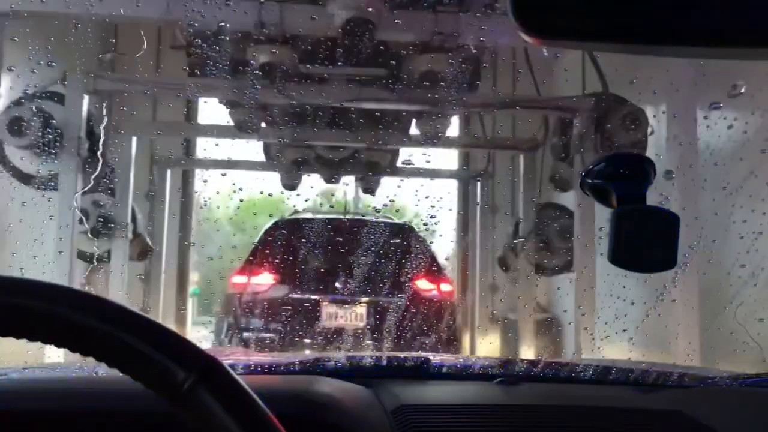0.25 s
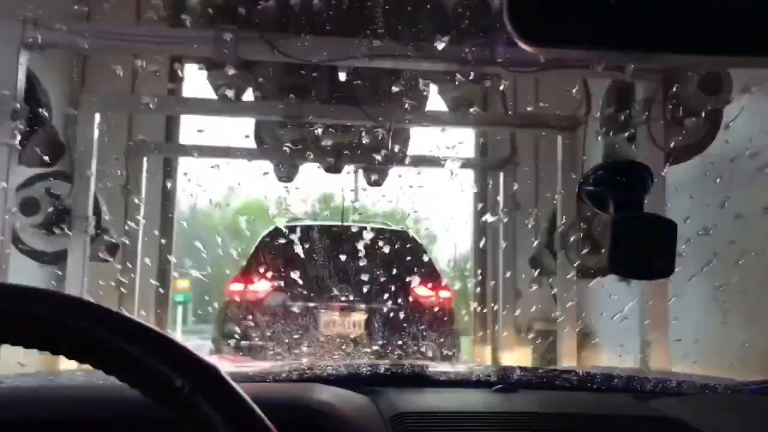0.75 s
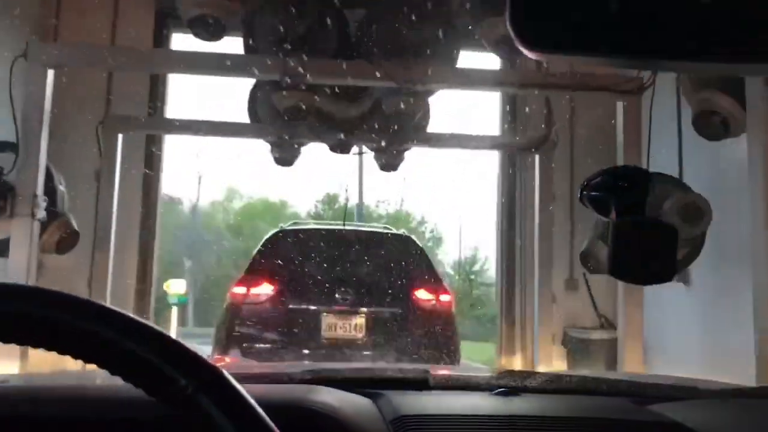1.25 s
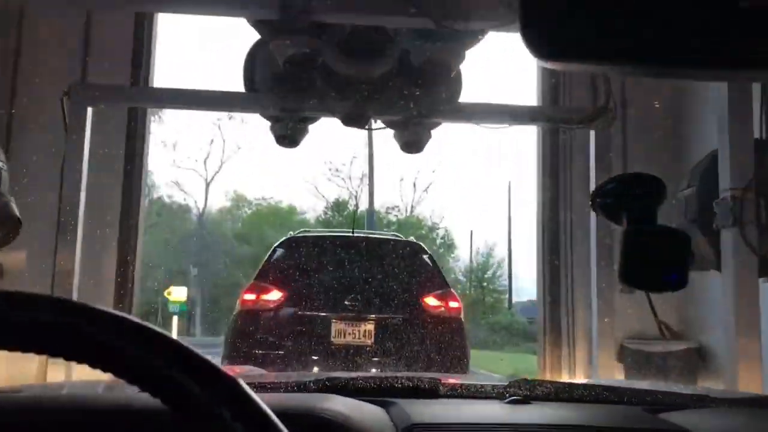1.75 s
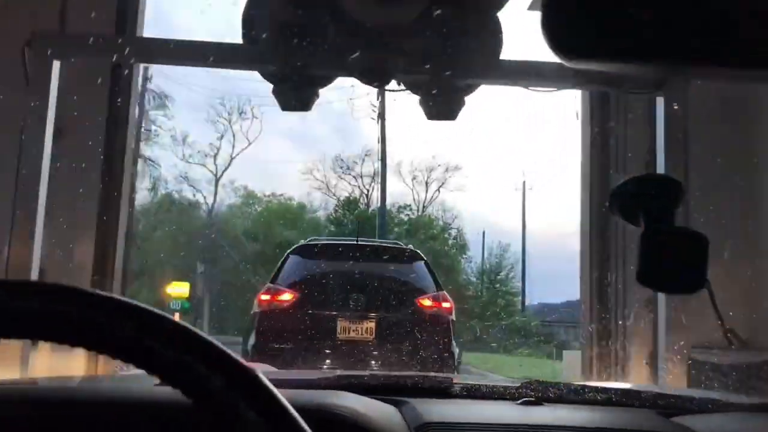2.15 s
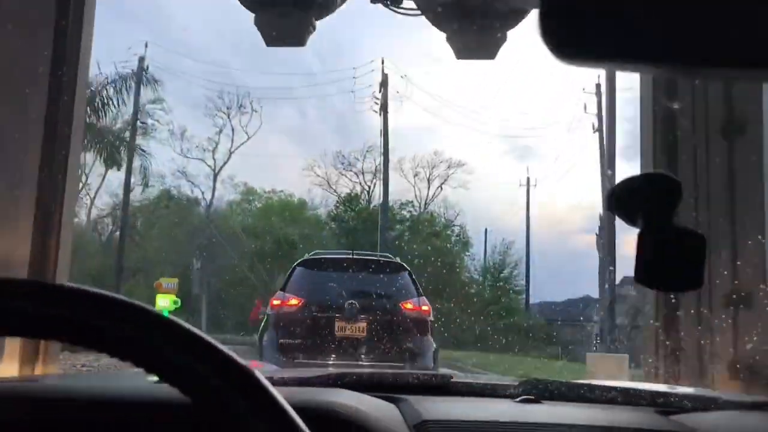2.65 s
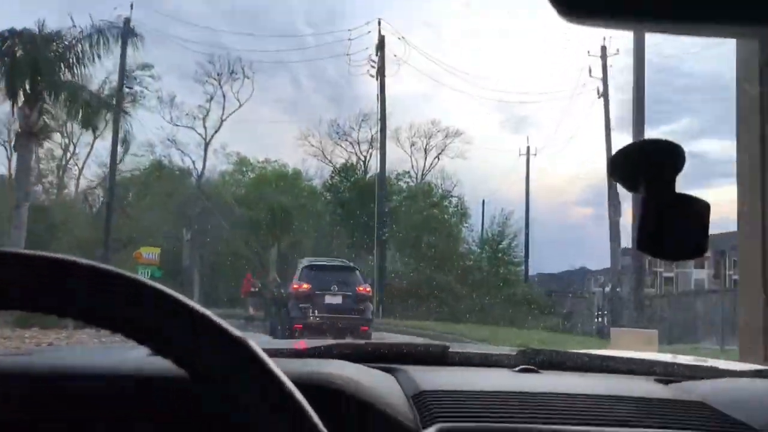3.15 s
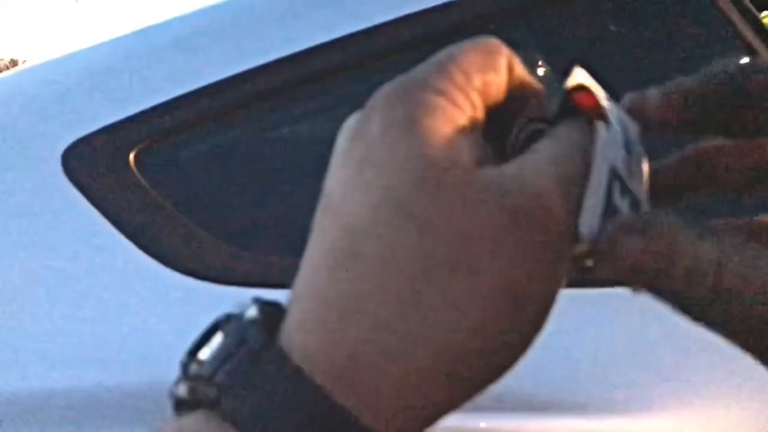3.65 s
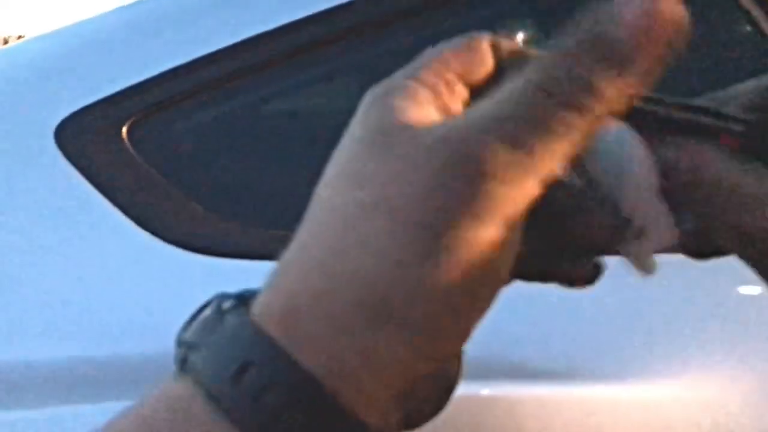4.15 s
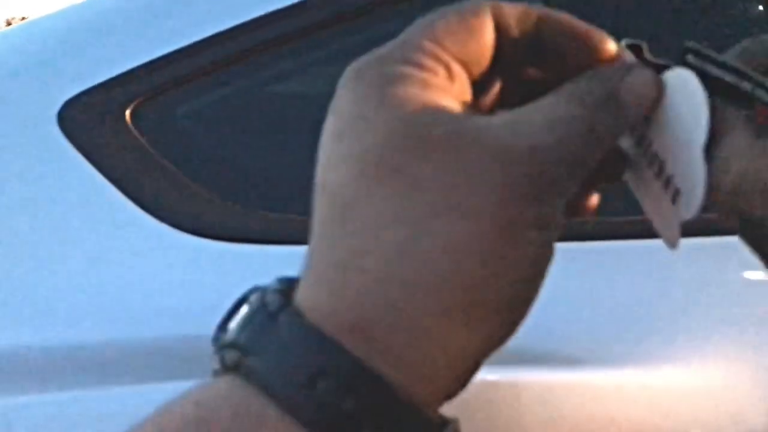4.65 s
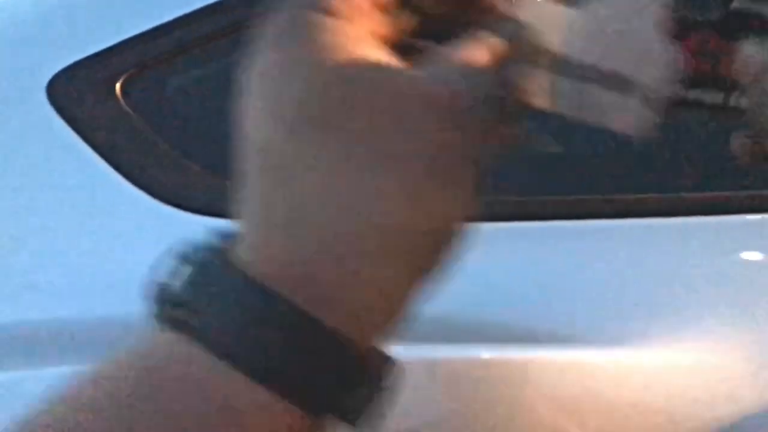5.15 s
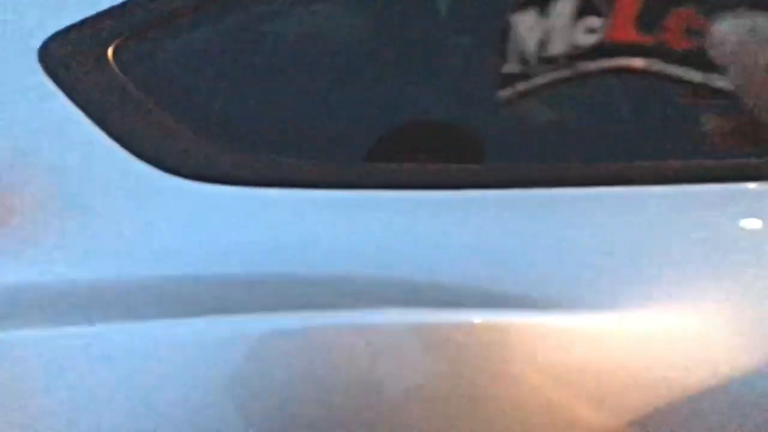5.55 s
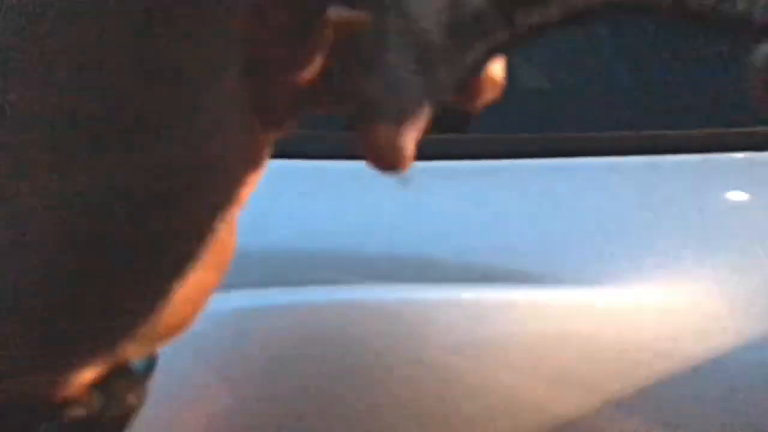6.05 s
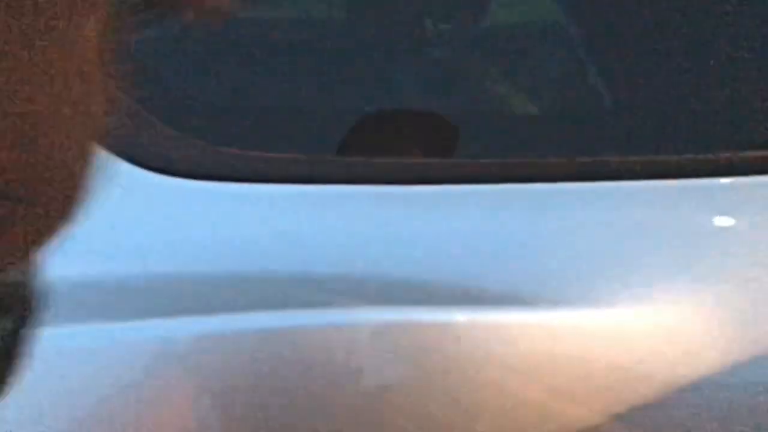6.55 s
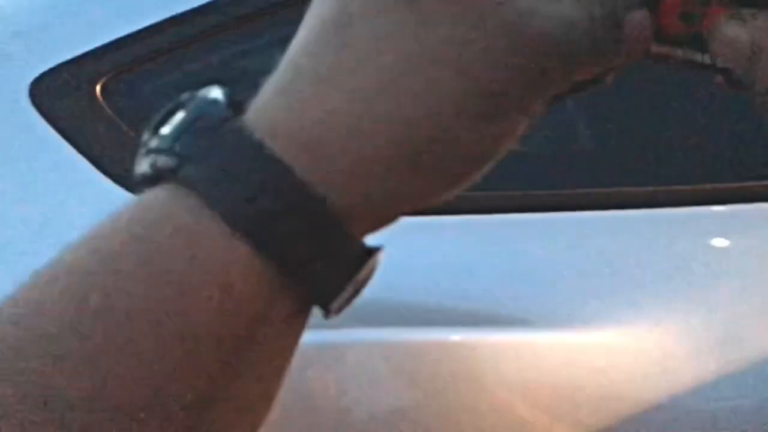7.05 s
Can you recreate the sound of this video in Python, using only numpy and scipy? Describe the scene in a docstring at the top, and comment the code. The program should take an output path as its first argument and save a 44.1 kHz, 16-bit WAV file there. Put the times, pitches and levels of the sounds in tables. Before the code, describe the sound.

From 0 to about 3.4 seconds, heard inside a car, drying blowers roar over the windshield and roof: dense, fluttering air noise with wavering fan whine around the middle pitches, hissing spray strongest at the very start, and tiny very high squeaks between 0.3 and 1.6. The roar grows steadily, with deep roof booms from 1.7 onward and a breathy nozzle whistle. At 3.4 it cuts dead to a quiet street with low distant traffic. Close to the microphone, fingers rustle and peel stiff plastic film, with crisp small snaps until 4.3, softer sliding to 4.9, then busier scraping rising into one loud sharp crack at 5.3. A small bird twitters from 5.5 to 6.8, most clearly near 5.8. Hollow knocks and clicks on the car body cluster at 6.2 to 6.5, then faint rubbing and light ticks continue to the end at about 7.3.

```python
"""Inside a car under the drying blowers of a car wash, then, at a hard cut, a quiet street; all mono.
Wash: layered noise is the air drumming on roof and glass, shaken sines are the fan blades, chirps squeak.
Street: noise bands are far traffic, gliding tones are a songbird. Hands work a plastic sticker close by:
noise strokes rustle, gliding bands scrape, decaying bursts snap, short sines knock on the car body."""
import sys
import numpy as np
from scipy import signal
from scipy.fft import rfft, irfft, next_fast_len
from scipy.io import wavfile

SR = 44100
rng = np.random.default_rng(int(sys.argv[2]) if len(sys.argv) > 2 else 0)


def put_to_file(sound):
    """Save the sound as 16-bit audio at rate SR, in the file named by the first command-line argument."""
    columns = np.atleast_2d(sound).T  # one column per channel
    safe = np.clip(columns, -1, 1)
    whole_steps = np.round(safe * 32767)
    wavfile.write(sys.argv[1], SR, whole_steps.astype(np.int16))


def amplitude_ratio(level_db):
    """Convert a level in decibels to the matching linear amplitude (field) ratio."""
    exponent = np.asarray(level_db, float) / 20
    return 10 ** exponent


N = 321489
CUT_S = 3.3775   # wash before, street after


def rms_one(x):
    """Scale to unit rms."""
    return x / np.sqrt(np.mean(x ** 2) + 1e-20)


def in_time(rows):
    """Table columns joined by straight lines, one value a sample."""
    s, *columns = np.transpose(rows)
    return [np.interp(np.arange(N) / SR, s, c) for c in columns]


def drift(corner_hz):
    """Slow random curve, rms 1: noise through two equal poles at corner_hz, drawn every 40 samples."""
    r = np.exp(-80 * np.pi * corner_hz / SR)
    slow = signal.lfilter([1], [1, -2 * r, r * r], rng.standard_normal(N // 40 + 2002))[2000:]
    return np.interp(np.arange(N) / 40, np.arange(len(slow)), rms_one(slow))


def resonance(x, hz, width_hz):
    """Two-pole band-pass with gain 1 on top."""
    r = np.exp(-np.pi * width_hz / SR)
    poles = [1, -2 * r * np.cos(2 * np.pi * hz / SR), r * r]
    return signal.lfilter([(1 - r * r) / 2, 0, (r * r - 1) / 2], poles, x)


def coloured(x, spectrum):
    """Filter a steady signal by (f/Hz, level/dB) points; rms 1."""
    hz, level_db = np.transpose(spectrum)
    size = next_fast_len(N)
    log_hz = np.log(np.arange(size // 2 + 1) * SR / size + 1)
    gain = amplitude_ratio(np.interp(log_hz, np.log(hz), level_db))
    return rms_one(irfft(rfft(x, size) * gain, size)[:N])


def layers(x, splits_hz):
    """Cut a signal into neighbouring frequency layers, each scaled to rms 1."""
    lows = [signal.sosfiltfilt(signal.butter(2, hz, fs=SR, output="sos"), x) for hz in splits_hz]
    return [rms_one(b - a) for a, b in zip([0] + lows, lows + [x])]


def grains(per_s, spread_db):
    """Random clicks of uneven size and sign; rms 1."""
    sizes = amplitude_ratio(spread_db * np.minimum(rng.exponential(1, N), 5)) * rng.choice([-1, 1], N)
    return rms_one(sizes * (rng.random(N) < per_s / SR))


def moving_band(hz, width_hz):
    """Noise in a band whose centre follows a curve: low noise on two carriers in quadrature; rms 1."""
    phase = 2 * np.pi * np.cumsum(hz) / SR
    low_pass = signal.butter(4, width_hz / 2, fs=SR, output="sos")
    a, b = signal.sosfilt(low_pass, rng.standard_normal((2, N)))
    return rms_one(a * np.sin(phase) + b * np.cos(phase))


def swell(s, db, rise_s, fall_s):
    """Gain peaking at s, straight in dB: 15 dB down one rise before and one fall after."""
    lag = np.arange(N) / SR - s
    return amplitude_ratio(db - 15 * np.maximum(-lag / rise_s, lag / fall_s))


def plateau(start_s, end_s, edge_s):
    """1 between two times, 0 outside, with sloping edges."""
    half = edge_s / 2
    corners = [start_s - half, start_s + half, end_s - half, end_s + half]
    return np.interp(np.arange(N) / SR, corners, [0, 1, 1, 0])


# traffic rumble: (t/s, level/dB)
TRAFFIC = [(3.4, -53), (4.3, -54.5), (4.71, -53), (5.0, -54), (5.63, -53), (5.85, -52), (6.29, -50),
           (6.55, -51), (7.29, -52)]
# traffic spectrum: (f/Hz, relative density/dB)
TRAFFIC_SPECTRUM = [(12, -42), (20, -23), (50, 3.5), (125, 2.5), (346, -10.5), (600, -12), (978, -16),
                    (1330, -21.5), (1700, -29.5), (2100, -36), (2600, -42), (3380, -47.5), (5720, -120)]
# low hum: (f/Hz, width/Hz, level/dB)
LOW_HUM = (121.5, 9, -61.5)
# whine swells: (peak t/s, level/dB, rise/s, fall/s)
WHINE_SWELLS = [(3.4, -57.5, 0.03, 1.55), (4.6, -70, 0.048, 2.5), (5.32, -53, 0.037, 0.035),
                (6.2, -69, 0.64, .2), (7.2, -65.5, 0.55, 0.16)]
# whine bands: (f/Hz, width/Hz, relative level/dB)
WHINE_MODES = [(1250, 300, 0), (2180, 260, -14)]


def street():
    """Far traffic: lumpy noise rumble, smoother tyre hiss following it, a narrow-band hum and whine."""
    tyre_db = -58.5   # at mean rumble
    rumble, hiss = layers(coloured(rng.standard_normal(N), TRAFFIC_SPECTRUM), splits_hz=(300,))
    rumble_db, = in_time(TRAFFIC)
    hiss_db = tyre_db + rumble_db - rumble_db.mean()
    white = rng.standard_normal(N)
    hum_hz, hum_width_hz, hum_db = LOW_HUM
    hum = amplitude_ratio(hum_db) * rms_one(resonance(white, hum_hz, hum_width_hz))
    whine = sum(amplitude_ratio(db) * rms_one(resonance(resonance(white, hz, width), hz, width))
                for hz, width, db in WHINE_MODES)
    whine = whine * sum(swell(*row) for row in WHINE_SWELLS)
    rumble = amplitude_ratio(rumble_db + 1.0 * drift(10.0)) * rumble
    hiss = amplitude_ratio(hiss_db + 0.25 * drift(27.0)) * hiss
    return rumble + hiss + hum + whine


# buzzy notes: (start t/s, length/s, start f/Hz, end f/Hz, level/dB)
BUZZY_NOTES = [(5.51, 0.018, 2500, 3190, -69), (5.518, 0.021, 3120, 3330, -65),
               (5.532, .021, 3350, 3300, -63), (5.55, .022, 3180, 2450, -68),
               (5.735, 0.055, 2790, 2810, -67), (5.788, .014, 2830, 3150, -70)]
# whistled notes: (start t/s, length/s, start f/Hz, end f/Hz, level/dB)
WHISTLED_NOTES = [(5.472, 0.018, 2870, 2800, -74), (5.585, .045, 3330, 3350, -77),
                  (5.63, .045, 3000, 2900, -77), (5.672, .024, 3300, 3800, -73),
                  (5.694, .018, 3850, 3150, -74), (5.799, 0.032, 3150, 3500, -62),
                  (5.83, 0.056, 3620, 3940, -57), (5.88, 0.018, 3960, 4150, -60),
                  (5.892, .05, 3800, 3890, -69), (5.949, .015, 3800, 4000, -68),
                  (5.963, 0.053, 4530, 4740, -67), (6.008, .022, 4740, 4580, -72),
                  (6.03, 0.034, 4700, 4800, -80), (5.838, 0.02, 1260, 1300, -55),
                  (5.858, 0.03, 1350, 1440, -64), (6.11, .021, 5400, 5550, -70),
                  (6.137, .098, 6070, 6100, -68), (6.506, .022, 4600, 4400, -71),
                  (6.697, 0.014, 3050, 3170, -73), (6.72, 0.022, 3200, 3150, -67.5),
                  (6.752, 0.015, 3150, 2950, -67), (6.805, .018, 3050, 3150, -73),
                  (4.815, .04, 3720, 3570, -69), (4.927, 0.022, 3920, 4000, -63)]
# upsweeps: (start t/s, length/s, level at the top/dB)
UPSWEEP_NOTES = [(6.056, 0.054, -61), (6.327, 0.056, -58), (6.472, 0.044, -65)]
# pitch paths: (share of length, share of climb); upsweeps slow on the way
UPSWEEP_PATH = [(0, 0), (.35, .55), (.62, .68), (.72, .88), (1, 1)]
PLAIN_PATH = [(0, 0.093), (1, 0.95)]


def bird(echo_s=0.016, echo_db=-22, jitter_hz=16.0, flutter_db=2.5, edge_share=0.21):
    """Unsteady gliding sines with harmonics; strong-weak cycles of a buzz add 1.5 and 2.5 x pitch; wall echo."""
    half_line_db, sweep_hz, sweep_swell_db = -11, (2500, 4750), 8
    second_db, second_db_per_khz = -7, -15.5   # second harmonic at 3 kHz; weaker above and below
    pure_below_db = -64   # softer clear notes lose 1 dB of second harmonic per dB
    gain_db = 1   # rise over a note
    out, waver, flutter = np.zeros(N), jitter_hz * drift(90.0), amplitude_ratio(flutter_db * drift(70.0))
    notes = [(*row, amplitude_ratio(half_line_db), 0, PLAIN_PATH) for row in BUZZY_NOTES]
    notes += [(*row, 0, 0, PLAIN_PATH) for row in WHISTLED_NOTES]
    notes += [(s, length, *sweep_hz, db, 0, sweep_swell_db, UPSWEEP_PATH) for s, length, db in UPSWEEP_NOTES]
    for s, length, start_hz, end_hz, db, half, swell_db, path in notes:
        at = np.arange(round(s * SR), round((s + length) * SR))
        n = len(at)
        hz = start_hz + (end_hz - start_hz) * np.interp(np.linspace(0, 1, n), *np.transpose(path))
        phase = 2 * np.pi * np.cumsum(hz + waver[at]) / SR
        purer_db = (half == 0) * min(db - pure_below_db, 0)
        second = amplitude_ratio(second_db + second_db_per_khz * np.abs(hz / 1000 - 3) + purer_db)
        upper_half = np.clip(2.7 - hz / 1300, 0, 1) * np.sin(5 * phase / 2)
        tone = np.sin(phase) + half * (np.sin(3 * phase / 2) + upper_half) + second * np.sin(2 * phase)
        level_db = db - swell_db * np.linspace(1, 0, n) ** 2 + gain_db * np.linspace(-.5, .5, n)
        out[at] += np.sqrt(2) * amplitude_ratio(level_db) * tone * signal.windows.tukey(n, edge_share)
    out *= flutter
    return out + amplitude_ratio(echo_db) * np.roll(out, round(echo_s * SR))


# hollow knocks of a hand on the car body: (t/s, peak level/dB, f/Hz, t60/s)
BODY_KNOCKS = [(6.2375, -35, 560, .03), (6.246, -37, 520, 0.043), (6.2565, -33, 640, 0.032),
               (6.312, -42, 626, 0.037), (6.415, -37, 630, 0.06), (6.423, -41, 700, .05),
               (6.521, -41, 594, .05), (6.541, -44, 600, .04)]


def knocks():
    """Each knock is one panel mode: a sine with a soft attack and exponential decay."""
    out, t = np.zeros(N), np.arange(round(.15 * SR)) / SR
    for s, db, hz, t60 in BODY_KNOCKS:
        decay = amplitude_ratio(db - 60 * t / t60) * np.minimum(t / 0.0042, 1)
        out[round(s * SR):][:len(t)] += decay * np.sin(2 * np.pi * hz * t)
    return out


# hand glides: (start t/s, end t/s, level/dB)
HAND_GLIDES = [(4.47, 4.97, -82), (6.678, 7.26, -85.5)]
# airy rings of a glide: (f/Hz, width/Hz, relative level/dB)
GLIDE_RINGS = [(2240, 250, 4.5), (2900, 300, 6.5), (3680, 300, 2), (5900, 810, 0), (7500, 500, 1),
               (8600, 600, -5)]


def glides():
    """Faint airy rings while the hand glides: noise bands wandering in pitch and level."""
    rings = sum(amplitude_ratio(db + 4.0 * drift(12.0)) * moving_band(hz * (1 + .02 * drift(3.0)), width)
                for hz, width, db in GLIDE_RINGS)
    return rings * sum(amplitude_ratio(db) * plateau(a, b, edge_s=.08) for a, b, db in HAND_GLIDES)


# film spectrum: (f/Hz, relative density/dB)
FILM_SPECTRUM = [(1060, -2.5), (1800, 2), (2720, -2.5), (3440, -3.5), (3910, -2), (4530, -3), (4970, -5),
                 (6180, -4), (8590, -7.5), (10400, -8), (11700, -3), (14300, -2), (16000, -4)]
# floor between strokes: slide, rub, top hiss (level/dB each)
RESTING_LEVELS = (-77, -84, -92)
# fingers slide, glue lets go: (start t/s, end t/s, level/dB, growth/dB, brightness/dB)
FINGER_STROKES = [(3.427, 3.455, -62, 1, 5), (3.456, 3.494, -65.5, -2, 0), (3.49, 3.53, -63.5, -6.5, -3),
                  (3.596, 3.646, -67.5, -3, 1.5), (3.656, 3.765, -67.5, -6, -0.5),
                  (3.76, 3.8, -80.5, 0, -6), (3.826, 3.885, -75, -0.5, -3), (3.885, 3.972, -68.5, 0, 5.5),
                  (3.975, 4.017, -70, -2, -16), (4.015, 4.108, -71, 2.5, 3), (4.133, 4.163, -65, -2, 0),
                  (4.185, 4.24, -73.5, 0, 8.5), (4.283, 4.327, -66, 7, 4.5), (4.331, 4.38, -78, 5, 3),
                  (4.39, 4.448, -74, -9.5, 3.5), (4.533, 4.95, -67, 2, -13.5),
                  (4.587, 4.625, -68, -3, -0.5), (4.662, 4.7, -72.5, 2, -3.5), (4.83, 4.95, -78.5, 7, 6),
                  (4.953, 5.044, -65.5, 2, 1), (5.04, 5.207, -75.5, -3, 6.5),
                  (5.071, 5.125, -61.5, 4.5, -2), (5.125, 5.2, -71.5, -4, -3),
                  (5.198, 5.308, -69.5, 10.5, 8.5), (5.33, 5.4, -79.5, -2, 1),
                  (5.42, 5.72, -74.5, 6.5, -12.5), (5.719, 5.737, -59, -4.5, -3),
                  (5.79, 6.083, -73, -8, -8), (6.087, 6.24, -71, 2, 4), (6.24, 6.33, -65.5, 0, 0),
                  (6.305, 6.319, -63.5, 0, 3), (6.392, 6.412, -68, 0, 1.5), (6.33, 6.522, -71, -6.5, 1),
                  (6.523, 6.6, -79.5, -7, -3), (6.64, 7.0, -68.5, -2, -14.5), (7.028, 7.243, -68.5, 0, -13),
                  (7.08, 7.109, -77, -2.5, 7), (7.17, 7.285, -77.5, 4, 4)]


def rustle(grain_share=0.68, patchy_db=1.4):
    """Skin friction is smooth noise, tearing glue adds dense grains; both come in clumps."""
    stroke_edge_s, linger_s, linger_share = 0.0128, 0.03, .14   # a share of the power dies away slowly
    top_hiss_db, top_follows = -5, 0.99   # top hiss re slide; share of brightness
    slide_base_hz, slide_hz_per_db = 3530, 44   # brighter strokes ring higher
    rub = rng.standard_normal(N) + grain_share * grains(2500, spread_db=4.5)
    low, body, top = layers(coloured(rub, FILM_SPECTRUM), splits_hz=(4400, 10300))
    power = amplitude_ratio(np.array(RESTING_LEVELS)[:, None] * np.ones(N)) ** 2
    for a, b, db, growth_db, bright_db in FINGER_STROKES:   # strokes add in power
        level_db = db + growth_db * np.interp(np.arange(N) / SR, [a, b], [-.5, .5])
        stroke = plateau(a, b, stroke_edge_s) * amplitude_ratio(level_db)
        layer_db = np.array([[0], [bright_db], [top_hiss_db + top_follows * bright_db]])
        power += (stroke * amplitude_ratio(layer_db)) ** 2
    keep = np.exp(-1 / (linger_s * SR))
    lingering = signal.lfilter([1 - keep], [1, -keep], power)
    power = (1 - linger_share) * power + linger_share * lingering
    power = power * amplitude_ratio([patchy_db * drift(25.23) for _ in power]) ** 2   # patches per layer
    slide_hz = slide_base_hz + slide_hz_per_db * 10 * np.log10(power[1] / power[0])
    slide = rms_one(low + .3 * amplitude_ratio(3 * drift(15.0)) * moving_band(slide_hz, 600.0))
    return amplitude_ratio(1.0 * drift(43.0)) * np.sum(np.sqrt(power) * [slide, body, top], axis=0)


# taut film under a scrape: (start t/s, end t/s, level/dB, start f/Hz, end f/Hz)
FILM_SCRAPES = [(3.43, 3.465, -66, 3600, 3500), (3.6, 3.72, -74, 3200, 3000), (3.9, 3.94, -70, 5800, 6200),
                (3.945, 3.98, -68, 4600, 4300), (4.14, 4.17, -71, 2500, 2400), (4.3, 4.33, -65, 6000, 6200),
                (4.955, 5.035, -69, 6000, 5900), (4.955, 5.035, -71, 3400, 3300),
                (5.08, 5.16, -65, 3500, 3400), (5.083, 5.165, -64, 6200, 6100),
                (5.09, 5.14, -68, 4600, 4600), (5.165, 5.2, -70, 6000, 6000),
                (5.195, 5.225, -70, 12500, 12500), (5.2, 5.28, -66, 4200, 4600),
                (5.225, 5.317, -64, 5000, 5500), (5.265, 5.317, -62, 5900, 6500),
                (5.28, 5.317, -67, 4300, 4300), (5.285, 5.317, -66, 1700, 1500),
                (5.24, 5.317, -66, 6800, 8000), (5.79, 5.9, -77, 6000, 6100),
                (6.11, 6.235, -71, 4300, 3900), (6.3, 6.33, -67, 4000, 4200), (6.68, 6.8, -73, 2900, 2700),
                (6.87, 7.2, -74, 2500, 2400), (7.12, 7.16, -73, 3300, 3300)]


def scrapes(width_share=.2, patchy_db=2.0, crackle_db=2.0, edge_s=.02):
    """The taut film rings under each scrape: a patchy, crackling noise band gliding between two pitches."""
    t, out = np.arange(N) / SR, np.zeros(N)
    crackle = rms_one(amplitude_ratio(crackle_db * drift(150.0)))
    for a, b, db, *ends_hz in FILM_SCRAPES:
        band = moving_band(np.interp(t, [a, b], ends_hz), width_share * ends_hz[0])
        out += amplitude_ratio(db + patchy_db * drift(40.0)) * plateau(a, b, edge_s) * band
    return crackle * out


# creases snapping: (t/s, ring peak level/dB, ring f/Hz, thud re ring/dB, top re ring/dB)
CREASE_SNAPS = [(3.4397, -36.5, 7200, -27.5, -18), (3.447, -44, 3600, -15, -24),
                (3.483, -44, 2900, -15, -32), (3.496, -40, 6240, -23, -2), (3.5083, -41.5, 7700, -10, -19),
                (3.5768, -53, 6500, -3, -21), (3.7875, -44.5, 4360, 0.5, -19), (3.807, -52, 4520, -9, -9),
                (3.814, -47, 3780, -14, -15), (3.8144, -46.5, 7200, -20, -8), (3.8254, -51, 1920, -21, -34),
                (3.887, -54, 7000, -15, -12), (3.906, -52, 7500, -15, -10), (3.934, -48, 5370, -12, -13),
                (3.958, -45, 4390, -12, -23), (3.964, -50, 4300, -16, -25), (3.973, -50, 4200, -16, -25),
                (4.0155, -55, 3500, -15, -15), (4.124, -40.5, 2590, -13, -15),
                (4.1243, -42, 6500, -20, -12), (4.1405, -46.5, 2500, 0, -15), (4.1644, -54, 6190, -9, -8),
                (4.217, -51, 5500, -10, -8), (4.251, -57, 6000, -15, -18), (4.293, -54, 6000, -15, -20),
                (4.302, -53, 7000, -15, -16), (4.323, -47, 7000, -15, -16), (4.3171, -44, 5900, -11, -24),
                (4.5401, -56, 2550, -1, -22), (4.691, -56, 3500, -15, -12), (4.743, -48.5, 8000, -18, -5),
                (4.7438, -47, 3750, 2, -15), (4.951, -39, 6000, -9, -16), (4.952, -38.5, 3750, -3, -21),
                (5.0944, -52, 2980, 10, -12), (5.106, -46.5, 3400, 6.5, -10), (5.109, -49, 5000, 0, -14),
                (5.1385, -49, 4200, -1, -18), (5.1347, -49, 3340, -8, -22),
                (5.3156, -19.5, 5540, -6.5, -9.5), (5.3171, -27.5, 3000, -4, -12),
                (5.3195, -31, 5500, -1, -8), (5.325, -34, 6500, -3, -10), (5.3362, -39, 5600, -23, -20),
                (5.3378, -38, 3000, -20, -30), (5.3484, -56, 5000, -5, -16), (5.362, -61, 5990, -10, -7),
                (5.369, -55, 5000, -10, -25), (5.6022, -46, 2610, -14, -24), (5.657, -51.5, 2150, 6, -14),
                (5.7186, -35, 9200, -2, -11), (5.7196, -42.5, 3500, -5, -15), (5.723, -44, 5230, 1, -10),
                (5.731, -50, 3500, 6, -10), (5.8013, -55, 9000, 4, -5), (5.828, -49.5, 1710, 9.5, -45),
                (5.888, -60, 1400, 0, -40), (5.916, -65, 8000, -10, -8), (6.234, -52, 8000, -19, -6),
                (6.2373, -35, 3350, 1.5, -15), (6.239, -37, 5900, -10, -16), (6.242, -36, 3900, -14, -22),
                (6.247, -42, 4500, -7, -25), (6.2516, -41, 3700, -1, -21), (6.259, -40, 3840, 2, -14),
                (6.2694, -45, 4320, 3, -22), (6.282, -48, 3800, -18, -25), (6.2862, -40, 3800, -18, -24),
                (6.3093, -42, 4240, -23, -14), (6.312, -48, 4500, -10, -10), (6.3144, -42.5, 3420, 2, -4),
                (6.3598, -34.5, 3050, -10, -12), (6.373, -49, 3070, -15, -16), (6.394, -48, 3150, -16, -25),
                (6.398, -48, 3100, -16, -30), (6.403, -46, 4090, -29, -28), (6.4065, -43, 4000, -20, -28),
                (7.002, -49, 2230, -10, -1), (7.0234, -50, 6000, -20, -14), (7.0813, -52, 8000, -8, 0),
                (7.091, -55, 8000, -10, -6), (7.1004, -53, 2540, -1, -2), (7.199, -49, 5870, -17, -23),
                (7.227, -45, 5200, -10, -16)]


def snaps(ring_share=0.27, crack_db=6.0, crack_follows=0.49, tick=2.6):
    """A click with a dying noise tail excites a film ring, a broad crack, a top and a thud."""
    base_t60_s, louder_lasts = 0.0105, 0.085   # t60 of a -44 dB snap; dB of t60 per dB of level
    out, t = np.zeros(N), np.arange(round(.15 * SR)) / SR
    noises = rng.standard_normal((len(CREASE_SNAPS), len(t)))
    for (s, db, hz, thud_db, top_db), noise in zip(CREASE_SNAPS, noises):
        t60 = base_t60_s * amplitude_ratio(louder_lasts * (db + 44))
        burst = noise * amplitude_ratio(-60 * t / np.clip(t60, .004, .2)) + tick * (np.arange(len(t)) == 0)
        # lows start later, last longer
        thump = noise[::-1] * amplitude_ratio(-60 * t / np.clip(2 * t60, .01, .3)) * np.minimum(t / 0.0032, 1)
        ring = resonance(resonance(burst, hz, ring_share * hz), hz, 2 * ring_share * hz)
        crack = resonance(burst, 3900, 6500)
        top = resonance(resonance(burst, 9500, 5000), 12500, 5000)
        thud = resonance(resonance(thump, 270, 540), 300, 980)
        thud = thud + 0.18 * resonance(resonance(thump, 810, 1300), 820, 1600)
        bands = [(ring, 0), (crack, crack_db + crack_follows * top_db), (top, top_db), (thud, thud_db)]
        snap = sum(amplitude_ratio(db + rel_db) * b / np.abs(b).max() for b, rel_db in bands)
        at = round(s * SR)
        out[at:at + len(t)] += snap[:N - at]
    return out


# thin squeaks: (t/s, peak level/dB, mid f/Hz)
THIN_SQUEAKS = [(0.2843, -45, 13700), (0.5916, -40, 14100), (0.7292, -44, 14400), (0.8071, -46, 13240),
                (1.105, -42, 13100), (1.1343, -45, 13600), (1.1982, -53, 13900), (1.2161, -45, 13200),
                (1.2965, -43, 15300), (1.3845, -47, 14200), (1.455, -43, 14300), (1.582, -47, 13800)]


def squeaks(length_s=.014, fall_hz=900):
    """Short whistles near 14 kHz: falling sine chirps under a Hann window."""
    out, t = np.zeros(N), np.arange(round(length_s * SR)) / SR
    for s, db, hz in THIN_SQUEAKS:
        chirp = np.sin(2 * np.pi * np.cumsum(hz + fall_hz * (.5 - t / length_s)) / SR)
        out[round(s * SR):][:len(t)] += amplitude_ratio(db) * np.hanning(len(t)) * chirp
    return out


# blade tones of the fans: (f/Hz)
BLADE_TONES_HZ = [532.9, 753.7, 1064, 1130, 1598, 2132, 2660, 5322, 5368, 10643]
# per blade tone: (flutter corner f/Hz, early level/dB, late level/dB)
BLADE_LEVELS = [(4.7, -50, -44), (7.2, -47, -57), (6, -40, -44), (6, -42, -50), (5.5, -42.5, -49),
                (7.2, -49, -50), (2.6, -43, -75), (9.6, -48, -42.5), (4, -56, -48), (9, -67, -65)]
# tones sink for a while: (start t/s, end t/s, change/dB)
BLADE_DIP = (1.22, 1.9, -2)
# lowest tone comes and goes: (start t/s, end t/s, boost/dB)
LOW_TONE_BOOSTS = [(.1, .33, 9), (0.55, 0.616, 13.5), (0.933, 1.253, 10), (1.941, 2.32, 11)]


def blades(blur_rad=0.92):
    """Fan blades whine: sines whose height and phase are shaken by turbulence."""
    t, out = np.arange(N) / SR, np.zeros(N)
    a, b, db = BLADE_DIP
    dip_db = db * plateau(a, b, edge_s=0.12)
    low_db = sum(db * plateau(a, b, edge_s=0.032) for a, b, db in LOW_TONE_BOOSTS)
    for hz, (flutter_hz, early_db, late_db) in zip(BLADE_TONES_HZ, BLADE_LEVELS):
        shake = amplitude_ratio(2.0 * drift(flutter_hz))
        tone = shake * np.sin(2 * np.pi * hz * t + blur_rad * drift(flutter_hz))
        level_db = np.interp(t, [0, CUT_S], [early_db, late_db]) + dip_db
        level_db = level_db + low_db * (hz == BLADE_TONES_HZ[0])
        out += np.sqrt(2) * amplitude_ratio(level_db) * tone
    return out


# air spectrum: (f/Hz, relative density/dB)
AIR_SPECTRUM = [(24, -73.5), (40, -45), (167, -43.5), (305, -1.5), (516, 5), (810, 1.5), (1150, 4.5),
                (1900, -8.5), (2400, -8.5), (2950, -11.5), (3400, -9), (3650, -13), (4130, -10.5),
                (4570, -25.5), (5440, -17.5), (6030, -18.5), (7060, -24.5), (7500, -23), (7850, -23),
                (8350, -24), (8650, -29.5), (9500, -25.5), (10300, -26.5), (11150, -22.5), (11550, -31),
                (14500, -28), (16000, -31.5)]
# duct and cabin resonances: (f/Hz, width/Hz, relative level/dB)
CABIN_MODES = [(528, 53, -16), (1173, 197, -6), (2185, 150, -20.5), (4060, 130, -21), (8130, 260, -31.5)]
# blowers near, jet swings windshield to roof: (t/s, nearness/dB, swing to roof/dB)
JET_PATH = [(0.03, 0.5, 3), (0.12, 1, -1.5), (0.45, 2, -1.5), (0.7, 3.5, 1), (0.85, 2, -5), (0.92, 3, -1),
            (1.1, 4, -4.5), (1.25, 4.5, 0.5), (1.4, 6.5, -6.5), (1.5, 7, 3), (1.57, 6, 1.5), (1.65, 7, -1),
            (1.72, 7.5, -5.5), (1.85, 7.5, -6.5), (2.0, 8, -3.5), (2.15, 7.5, 0), (2.3, 10, 1),
            (2.45, 9.5, 2), (2.6, 10.5, 5), (2.75, 10.5, 2), (2.9, 10.5, 1), (3.05, 11.5, 2),
            (3.27, 12.5, -1.5)]
# rumble, drumming roof, air roar, nozzle hiss, blown spray, finest spray:
# (far level/dB, dB per dB nearness, dB per dB swing)
AIR_LEVELS = [(-81.5, 0.95, 0.6), (-43, 1.2827, 0.77), (-36.5, 0.97, -0.59), (-32.5, 0.4572, 0),
              (-46.5, 0.1, 0.13), (-48.5, 0.05, 0.04)]
# sheets of water blown over the glass: (start t/s, end t/s, boost/dB)
SPRAY_SHEETS = [(0, 0.192, 10), (0.895, 1.298, 2.5), (1.48, 1.677, 3)]
# roof panel booms when the jet catches it: (peak t/s, level/dB, f/Hz, length/s)
ROOF_BOOMS = [(1.71, -24.5, 675, 0.055), (1.97, -28.5, 525.7, 0.085), (2.261, -24.5, 501, 0.11),
              (2.55, -24.5, 552.2, 0.13), (2.783, -24.5, 558, 0.22), (3.299, -27, 602.8, 0.26)]
# jet surges on the ringing windshield: (peak t/s, level/dB, f/Hz, length/s)
GLASS_SURGES = [(0.068, -34, 1120, 0.068), (1.297, -27.5, 1176, 0.28), (1.199, -30, 1150, 0.04),
                (1.421, -34, 1250, 0.097), (1.701, -34, 1148, 0.044), (1.798, -35, 1190, 0.26),
                (2.333, -29, 1200, .12), (2.848, -24.5, 1239, 0.28), (3.326, -30, 1226, 0.17)]
# breathy nozzle whistle: (t/s, level/dB, f/Hz)
NOZZLE_WHISTLE = [(0, -41, 4040), (1.6, -53, 4026), (1.95, -34.5, 4050), (2.4, -39.5, 4040),
                  (2.9, -32.5, 4046), (3.38, -39, 4060)]
# jet sweeping along the glass: (start t/s, end t/s, level/dB, start f/Hz, end f/Hz)
CLIMBING_JET = (1.62, 2.0, -34.5, 2000, 3500)


def blowers(buffet_db=1.0):
    """Turbulent air: noise layers buffeting partly on their own, plus panel, nozzle and jet bands."""
    air = coloured(rng.standard_normal(N), AIR_SPECTRUM)
    white = rng.standard_normal(N)
    air = air + sum(amplitude_ratio(db) * rms_one(resonance(white, hz, width)) for hz, width, db in CABIN_MODES)
    # the air noise keeps little below 230 Hz; the low rumble is a layer of its own
    air = signal.sosfilt(signal.butter(4, 229, "high", fs=SR, output="sos"), air)
    rumble = rms_one(signal.sosfilt(signal.butter(2, [25, 170], "band", fs=SR, output="sos"), white))
    *parts, spray, finest = [rumble] + layers(air, splits_hz=(800, 1900, 6000, 11300))
    spray_db = sum(db * plateau(a, b, edge_s=0.043) for a, b, db in SPRAY_SHEETS)
    parts += [spray * amplitude_ratio(spray_db), finest * amplitude_ratio(.4 * spray_db)]
    gust, (near_db, swing_db) = drift(9.8), in_time(JET_PATH)
    out = np.zeros(N)
    for (db, by_near, by_swing), part in zip(AIR_LEVELS, parts):
        buffet = buffet_db * (0.35 * gust + drift(28.0))
        out += amplitude_ratio(db + by_near * near_db + by_swing * swing_db + buffet) * part
    for rows, width_hz in [(ROOF_BOOMS, 85.0), (GLASS_SURGES, 390.0)]:
        gain = sum(swell(s, db, length, length) for s, db, hz, length in rows)
        out += gain * moving_band(in_time(rows)[1], width_hz)
    nozzle_db, nozzle_hz = in_time(NOZZLE_WHISTLE)
    out += amplitude_ratio(nozzle_db + 2.2 * drift(18.0)) * moving_band(nozzle_hz, 256.0)
    a, b, db, *ends_hz = CLIMBING_JET
    climb_hz = np.interp(np.arange(N) / SR, [a, b], ends_hz)
    return out + amplitude_ratio(db) * plateau(a, b, edge_s=0.11) * moving_band(climb_hz, 570.0)


# outdoor hollow of the microphone: (f/Hz, width/Hz, share removed)
MIC_HOLLOW = (10600, 1200, 0.47)


def scene():
    """The car wash ends at once; the street fades in over 2.6 ms."""
    t = np.arange(N) / SR
    wash = (squeaks() + blades() + blowers()) * (t < CUT_S)
    outside = street() + bird() + knocks() + glides() + rustle() + scrapes() + snaps()
    outside = outside * np.clip((t - CUT_S) / 0.0026, 0, 1)
    hz, width_hz, share = MIC_HOLLOW
    return np.tile(wash + outside - share * resonance(outside, hz, width_hz), (2, 1))


def band_limit(x):
    """A steep low-pass at the top of the band."""
    return signal.sosfilt(signal.butter(12, 16370, fs=SR, output="sos"), x)


def record(dry):
    """Mono sound on both channels: faint microphone hiss, then a steep low-pass."""
    mic_hiss_db, cutoff_hz = -85, 15730
    hissy = dry + amplitude_ratio(mic_hiss_db) * rng.standard_normal(N)
    mix = signal.sosfilt(signal.ellip(12, .5, 60, cutoff_hz, fs=SR, output="sos"), hissy)
    return band_limit(mix)


dry = scene()
out = record(dry)
put_to_file(out)
```